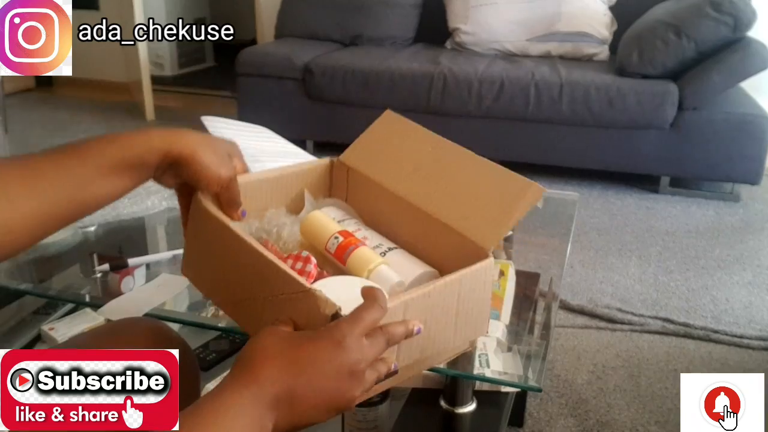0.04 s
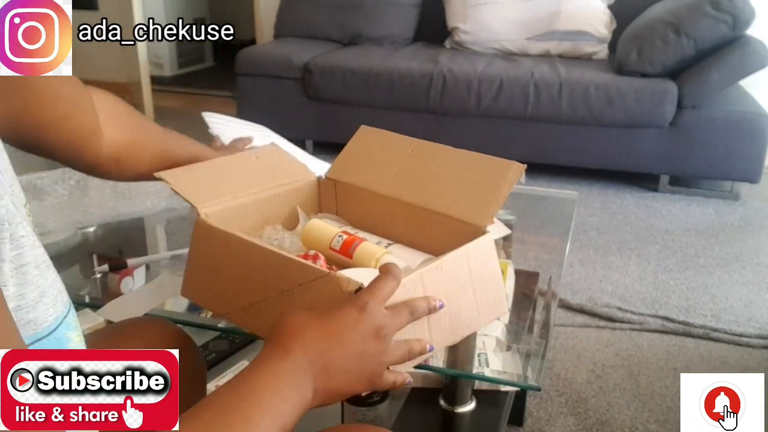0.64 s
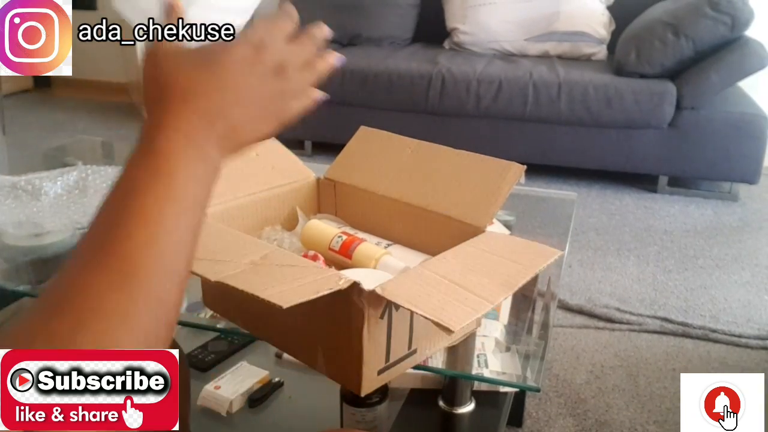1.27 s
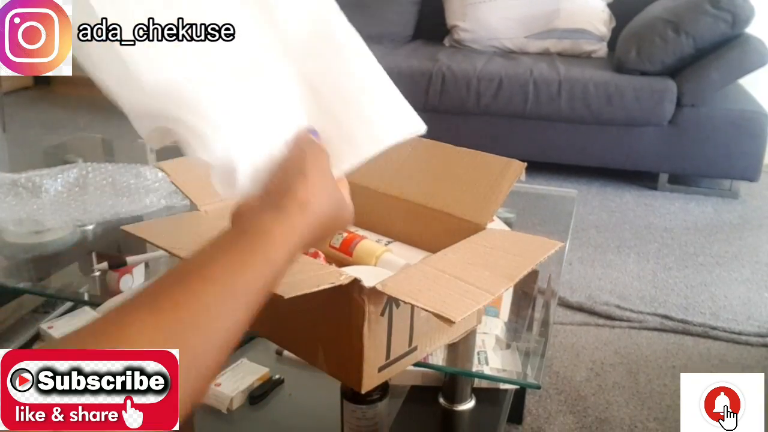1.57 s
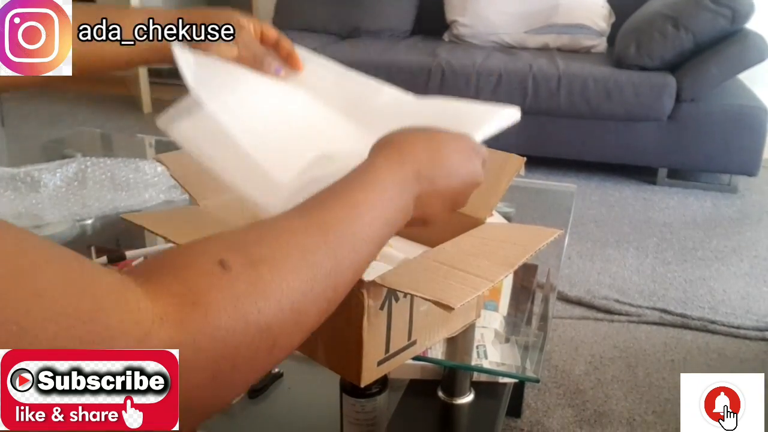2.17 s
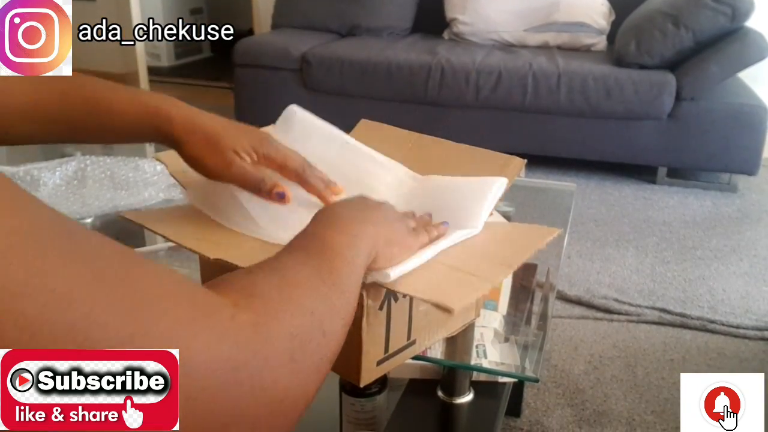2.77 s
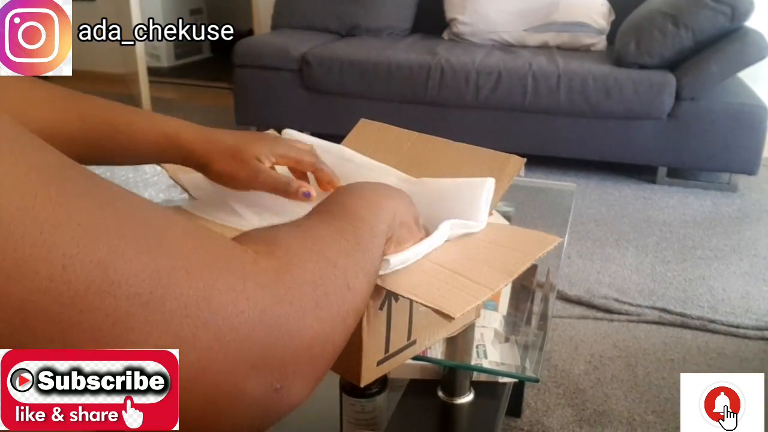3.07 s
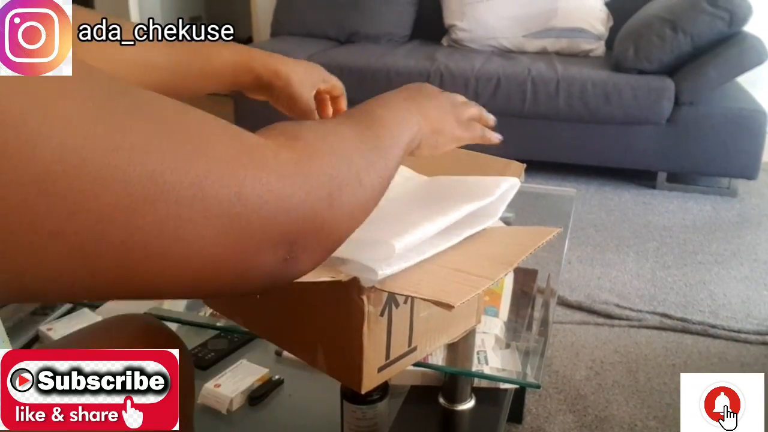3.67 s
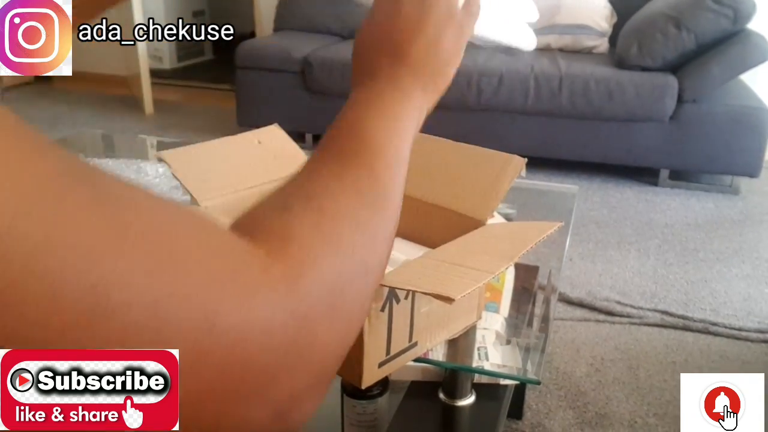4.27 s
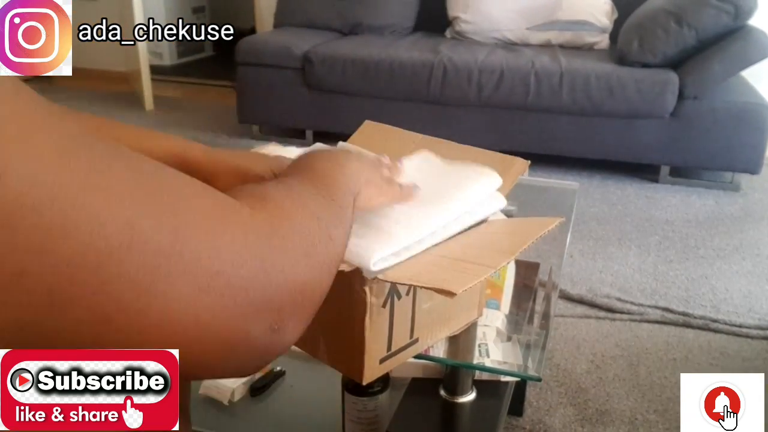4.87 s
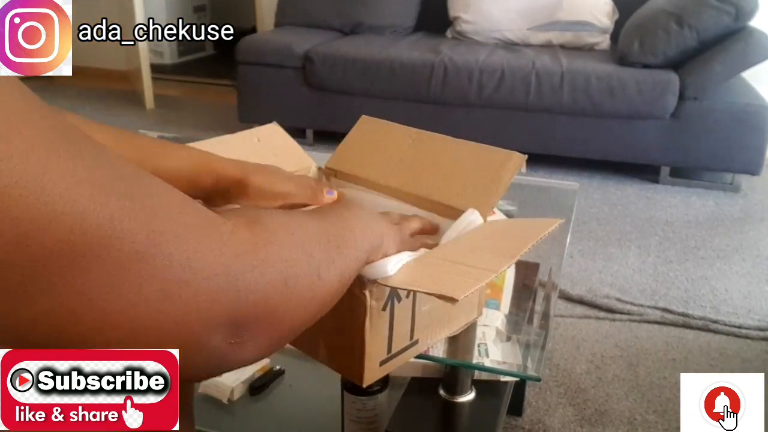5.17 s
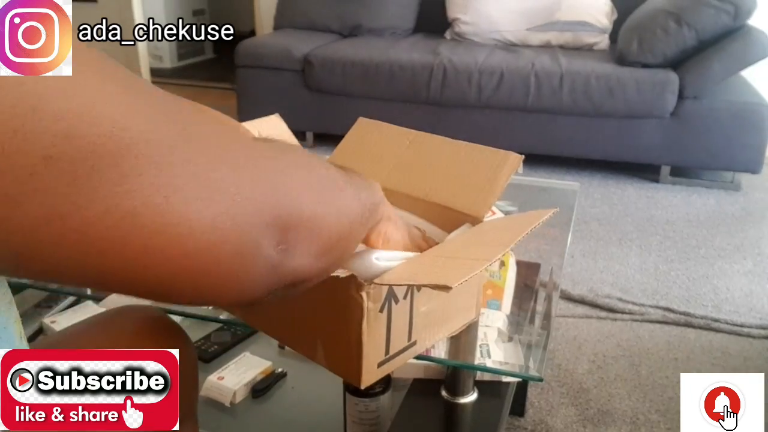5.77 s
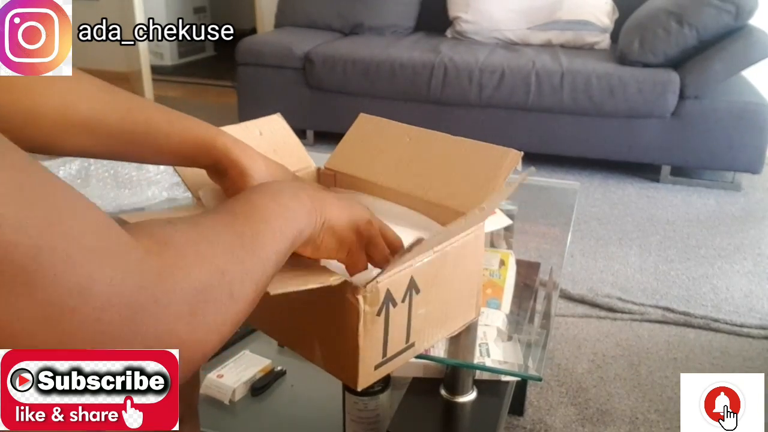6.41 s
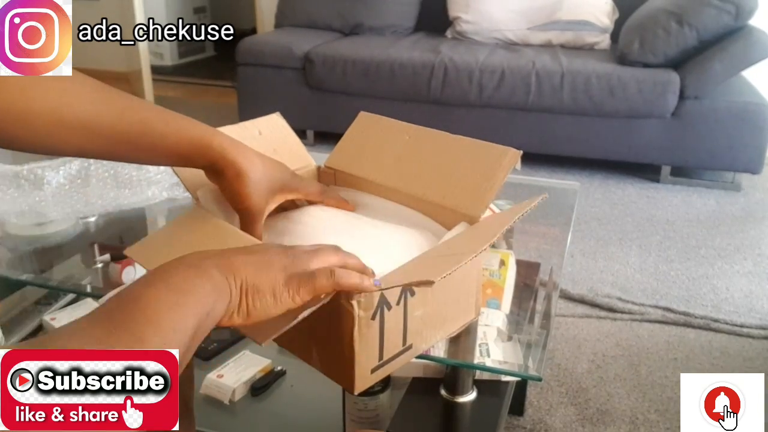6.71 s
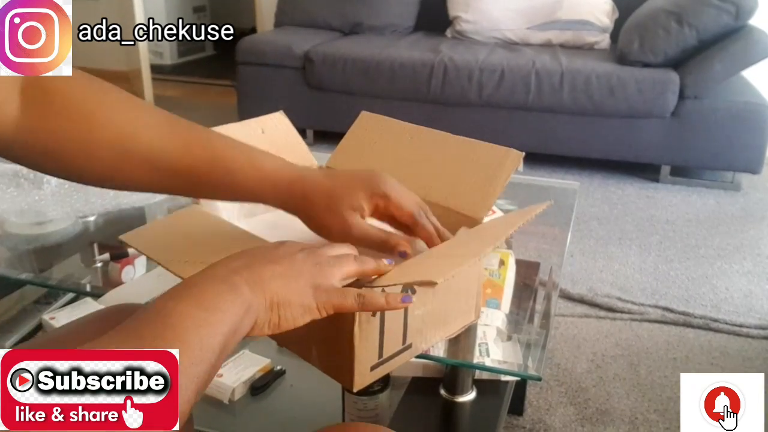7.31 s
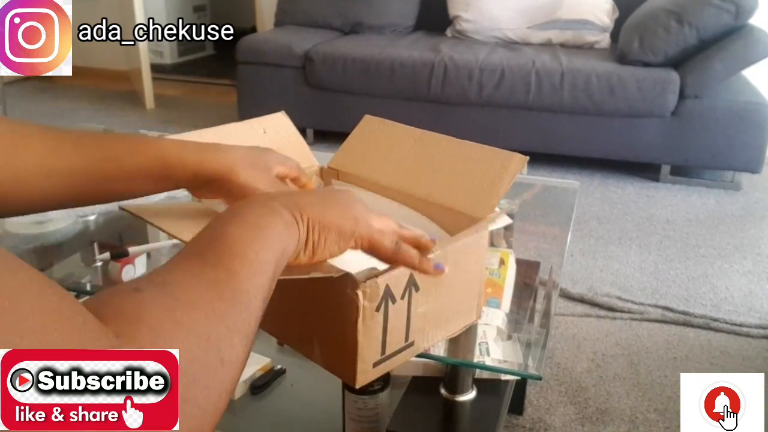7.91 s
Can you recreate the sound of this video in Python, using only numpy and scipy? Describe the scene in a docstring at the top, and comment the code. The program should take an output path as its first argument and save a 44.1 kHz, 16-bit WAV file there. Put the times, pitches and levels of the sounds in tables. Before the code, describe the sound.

A cardboard box is set down on a glass table with a quick cluster of hollow knocks and a faint scrape. Hands then slide and tuck foam wrap into it in short hissing, rasping strokes, loudest just past the middle, with occasional soft bumps and tiny crease snaps. Near the end the loose flaps clack and the box is knocked again. The sound is close, in a quiet furnished room with a faint low hum.

```python
"""Foam wrap hisses as hands lay it in a cardboard box and tuck it down, on a living-room glass table.
Stick-slip friction makes the hiss, rasps the sheet and drives the modes of the card beneath.
The box is set down and knocked: each impact rings its walls and the glass, and the whole box booms.
Loose flaps clack, dragged edges scrape and creases snap, over a low hum and the hiss of the air."""
import sys
import numpy as np
from scipy import signal
from scipy.fft import rfft, irfft
from scipy.io import wavfile
from scipy.ndimage import uniform_filter1d

SR = 44100
rng = np.random.default_rng(int(sys.argv[2]) if len(sys.argv) > 2 else 0)


def store_pcm(level_fs):
    """Save levels as 16-bit WAV."""
    pcm = np.round(np.clip(level_fs, -1, 1) * 32767).astype(np.int16)
    wavfile.write(sys.argv[1], SR, np.atleast_2d(pcm).T)


N = 355005

# hand strokes: start_s, swell_s, fade_s, hiss_db, rasp_over_hiss_db, card_over_hiss_db
HAND_STROKES = [(0.0, 0.0023, 0.85, -68, -1.5, 1.5), (0.18, 0.031, 0.22, -46.5, 3.5, 9),
                (.30, 0.077, 0.25, -49.5, -1.5, -14), (0.749, 0.16, 0.57, -58.5, -2, -12),
                (1.02, 0.12, 0.039, -59, -15.5, -27), (1.319, 0.1, 0.21, -60.5, -31, -4),
                (1.444, 0.085, 0.41, -42, -2, -5), (1.6, 0.081, 0.053, -44, -4, -15),
                (1.768, 0.16, 0.26, -53.5, -12, -21.5), (2.271, 0.015, 0.4, -53.5, -4.5, -5),
                (2.301, 0.13, 0.15, -51, 3, -2), (2.457, 0.12, 0.098, -40.5, -6, -3.5),
                (2.62, 0.19, .15, -53, -10, -22), (2.808, 0.047, 0.1, -41, -6.5, -4.5),
                (2.891, 0.043, .26, -51, -4.5, -14.5), (3.063, 0.084, 0.15, -44.5, -9, -15),
                (3.16, 0.1, 0.17, -47.5, 2.5, -3), (3.31, 0.06, 0.18, -46.5, -0.5, -5),
                (3.477, 0.016, 0.14, -43, 3.5, 3), (3.559, 0.068, 0.13, -45.5, -3, -8),
                (3.821, 0.03, 0.21, -52, -3.5, 10), (3.884, 0.039, 0.14, -39.5, -7, -29),
                (3.985, 0.038, 0.17, -48.5, 4.5, 0), (4.12, 0.058, 0.12, -48, -8.5, -36),
                (4.22, 0.088, 0.28, -50.5, -12, -38), (4.473, 0.075, 0.32, -41.5, -12.5, -22),
                (4.516, 0.054, 0.25, -51.5, 6.5, 5), (4.88, 0.07, 0.048, -42.5, -2.5, -8),
                (4.944, 0.075, 0.23, -35.5, -5, -9), (5.075, 0.075, 0.45, -36, 0, -0.5),
                (5.35, 0.12, 0.16, -53, 7.5, -6), (5.503, 0.06, 0.17, -41, -1.5, -5),
                (5.57, 0.11, 0.16, -38.5, -2.5, -9.5), (5.759, 0.15, 0.21, -44.5, 1, -4),
                (5.997, 0.094, 0.26, -40, -2, -9), (6.308, 0.062, 0.13, -42.5, 1, -6),
                (6.498, 0.091, 0.21, -45, -2.5, -7.5), (6.63, 0.062, 0.11, -46.5, -1.5, -4),
                (6.795, 0.069, 0.12, -47.5, -3.5, -4), (6.86, 0.024, 0.19, -51, 5, 8.5),
                (7.021, 0.11, 0.12, -46.5, 0.5, 0), (7.372, 0.041, 0.036, -39, -4, -1.5),
                (7.333, 0.1, 0.29, -48.5, 5, 5), (7.51, 0.067, 0.13, -54, 4, -6),
                (7.675, 0.085, 0.18, -45, -0.5, -3.5), (7.91, 0.16, .1, -43, -1.5, 1)]
# spectrum of foam on skin: frequency_hz, gain_db
HISS_SPECTRUM = [(1500, -13), (4000, 2), (5800, 0.5), (7800, -3), (9500, -1.5), (11500, 0.5), (14000, -1.5),
                 (16000, -5.5)]
# spectrum of the dragged sheet: frequency_hz, gain_db
RASP_SPECTRUM = [(600, -17), (1350, -2.5), (1900, -1), (2700, -2), (4000, -5), (5500, -13), (16000, -15.5)]
# spectrum of the rubbed box: frequency_hz, gain_db
CARD_SPECTRUM = [(60, 3), (220, -14), (380, -5.5), (620, 0.5), (1000, -1.5), (1500, -5.5), (4000, -16.5)]
# blows on the box: start_s, level_db, pitch_hz, relative_boom_db
BOX_KNOCKS = [(0.1885, -20.5, 1400, -4.5), (0.19, -16.5, 560, -3.5), (0.2562, -13.5, 1030, -7.5),
              (0.257, -16.5, 407, -17), (.409, -20.5, 840, -11), (0.441, -8, 694, -19.5),
              (1.490, -47, 183, 11.5), (1.57, -31, 563, -13), (1.657, -40.5, 281, 0),
              (2.403, -39, 286, 2.5), (2.846, -39.5, 336, -3.5), (3.828, -26, 643, -2.5),
              (4.521, -40.5, 295, 5), (4.5475, -25, 295, -6), (4.893, -45, 170, 15),
              (5.62, -22, 703, -17.5), (6.657, -45, 233, 5.5), (6.869, -32, 513, -7.5),
              (6.889, -28, 410, -16), (7.946, -24.5, 323, -11.5), (7.966, -26, 394, -15.5),
              (8.027, -22.5, 440, -10)]
# modes of the card walls: pitch_hz, level_db
WALL_MODES = [(277, 2), (360, 0.5), (535, -4), (645, -4), (785, -10.5), (880, -11), (995, -3.5),
              (1290, -4.5), (1400, -16.5), (1790, -24.5)]
# modes of the filled box on the table: pitch_hz, level_db, t60_s
BOOM_MODES = [(70.3, 2.5, 0.67), (86.6, 2, 0.24), (142.6, 2, 0.35)]
# modes of the table top: pitch_hz, level_db, t60_s
GLASS_MODES = [(2036, -31, 0.28), (2460, -27, 0.13)]
# reflections from the table top and the nearest wall: delay_s, gain_db
REFLECTIONS = [(0.0044, -19.5), (0.0088, -11)]
# clacks of loose flaps: start_s, level_db, pitch_hz
FLAP_CLACKS = [(2.433, -30.5, 1020), (3.484, -32, 3930), (3.5186, -28.5, 1660), (3.832, -37, 1380),
               (7.3506, -21.5, 1420), (7.4106, -18.5, 1130), (7.918, -37, 1160)]
# dragged edges: start_s, length_s, level_db, from_hz, to_hz
EDGE_SCRAPES = [(0.312, 0.23, -52, 2150, 2550), (0.737, 0.28, -62, 1220, 1610),
                (7.376, 0.053, -41.5, 4320, 3820)]
# snapping creases: start_s, level_db, decay_s
CREASE_SNAPS = [(0.193, -51, 0.001), (0.4406, -36.5, 0.00039), (1.45, -54.5, 0.0045), (1.734, -43, 0.0022),
                (2.433, -42, 0.0041), (4.478, -47.5, 0.0045), (6.201, -45, 0.0018), (7.3534, -38.5, 0.0011)]
# spectrum of a snap: frequency_hz, gain_db
SNAP_SPECTRUM = [(500, -14), (1500, -4.5), (4200, 14.5), (7500, 8.5), (10500, 16.5), (16000, 8)]
# spectrum of still air and microphone hiss: frequency_hz, gain_db
AIR_SPECTRUM = [(20, -19.5), (50, 13), (250, -3.5), (800, -9), (7000, -12.5), (12000, -8), (16000, -23.5)]
# reverberation time of the room: frequency_hz, t60_s
ROOM_DECAY = [(80, 0.53), (1000, 0.15), (15000, 0.052)]
# likeness of left and right: frequency_hz, coherence_ratio
STEREO_COHERENCE = [(250, 0.77), (800, 0.55), (2000, 0.23), (8000, 0)]
# level of left over right: frequency_hz, difference_db
STEREO_BALANCE = [(200, 0.5), (700, 1.5), (3600, 1), (6000, -1.6), (10000, 0.5)]


def foam_wrap():
    """Sliding friction excites the hiss of foam, the rasp of the sheet and the card under it."""
    hiss_gain, rasp_gain, card_gain = stroke_gains()
    grip = wander(rate_hz=30.0)  # the hand catches and lets go
    hiss = blotch(slips(per_s=3000, spread_db=3.5, smooth=1.3), depth_db=1.5, bins=6, frames=16)
    rasp = blotch(slips(per_s=900, spread_db=3.6, smooth=1), depth_db=2.6, bins=4, frames=20)
    card = blotch(slips(per_s=1000, spread_db=2.5, smooth=1), depth_db=2.8, bins=2, frames=22)
    hiss = unit(colour(hiss, HISS_SPECTRUM)) * amp(2.3 + grip)
    rasp = unit(colour(rasp, RASP_SPECTRUM)) * amp(1.3 + 0.14 * grip)
    card = unit(colour(wall_resonance(card), CARD_SPECTRUM)) * amp(1.5 + grip)
    return room(hiss * hiss_gain + rasp * rasp_gain + card * card_gain, wet_db=-13.5)


def stroke_gains(card_lag_s=0.0055):
    """Incoherent sources add in power: the strokes sum to the gains of hiss, rasp and card."""
    power, t = np.zeros((3, N)), np.arange(SR) / SR
    for start_s, swell_s, fade_s, hiss_db, rasp_db, card_db in HAND_STROKES:
        slide = stroke_envelope(t, swell_s, fade_s)
        press = stroke_envelope(t - card_lag_s, swell_s, fade_s)  # the hand meets the foam first
        layers = np.array([slide, amp(rasp_db) * slide, amp(card_db) * press])
        add(power, start_s, (amp(hiss_db) * layers) ** 2)
    return np.sqrt(power)


def stroke_envelope(t, swell_s, fade_s, drop_db=24):
    """Friction noise follows sliding speed: the hand gathers pace, then slows to rest."""
    speed = np.sin(np.pi / 2 * np.clip(t / swell_s, 0, 1))
    fading = np.maximum(t - swell_s, 0) / fade_s
    return speed ** 0.75 * amp(-drop_db * fading ** 1.09)


def slips(per_s, spread_db, smooth, decay_s=0.0013):
    """Stick-slip friction: tiny releases of uneven size ride on a smooth rubbing noise."""
    sizes = amp(spread_db * np.minimum(rng.exponential(1, N), 4))
    releases = sizes * (rng.random(N) < per_s / SR)
    power = signal.lfilter([1], [1, -np.exp(-1 / (decay_s * SR))], releases ** 2)
    return stereo(rng.standard_normal((2, N)) * np.sqrt(power / power.mean() + smooth ** 2))


def blotch(x, depth_db, bins, frames):
    """Random modulation: patches of the spectrum swell and fade, making the noise slightly blotchy."""
    spectra = signal.stft(x, nperseg=512, noverlap=384)[2]
    patches = uniform_filter1d(rng.standard_normal(spectra.shape[1:]), bins, axis=0)
    patches = unit(uniform_filter1d(patches, frames, axis=1))
    return signal.istft(spectra * amp(depth_db * patches), nperseg=512, noverlap=384)[1][:, :N]


def wall_resonance(x, boost_db=4, width_ratio=0.033):
    """Forced vibration: the walls amplify rubbing noise near their natural frequencies."""
    hz = np.fft.rfftfreq(N, 1 / SR)
    peaks = sum(amp(boost_db + db) / (1 + ((hz / f - 1) / width_ratio) ** 2) for f, db in WALL_MODES)
    return irfft(rfft(x) * (1 + peaks), N)


def box_knocks(dent_cycles=0.96, crack_db=-5, walls_db=-27, walls_t60_s=0.14, boom_db=-12):
    """An impact dents one spot, rocks the box and excites wall and glass modes near its own pitch."""
    knocks, booms, t = np.zeros(N), np.zeros(N), np.arange(SR // 2) / SR
    modes = [(f, walls_db + db, walls_t60_s) for f, db in WALL_MODES] + GLASS_MODES
    for start_s, level_db, pitch_hz, relative_boom_db in BOX_KNOCKS:
        cycles = pitch_hz * t
        spot = np.sin(2 * np.pi * cycles) * np.exp(-cycles / dent_cycles)
        crack = amp(crack_db) * np.sin(4 * np.pi * cycles) * np.exp(-2 * cycles)  # stiff first contact
        dent = -(spot + crack) * (1 - np.exp(-cycles / 0.13))
        excited = [(f, db - 10 * np.log10(1 + np.log2(f / pitch_hz) ** 4), t60) for f, db, t60 in modes]
        add(knocks, start_s, amp(level_db) * (dent + ring(excited, t)))
        for delay_s, gain_db in REFLECTIONS:
            add(knocks, start_s + delay_s, amp(level_db + gain_db) * dent)
        add(booms, start_s, amp(level_db + boom_db + relative_boom_db) * box_boom(t, pitch_hz))
    return room(knocks, wet_db=-7.0) + booms


def box_boom(t, pitch_hz):
    """Contact time limits bandwidth: a softer blow gives the whole box a longer, deeper push."""
    contact_s = 0.013 * (300 / pitch_hz) ** 1.64
    excited = [(f, db - 10 * np.log10(1 + (2 * f / pitch_hz) ** 4), t60) for f, db, t60 in BOOM_MODES]
    response = ring(excited, t)
    force = rng.standard_normal(len(t)) * t / contact_s * np.exp(-t / contact_s)
    boom = np.gradient(signal.fftconvolve(force, response)[:len(t)])  # only changes of motion radiate
    return boom * np.linalg.norm(response) / np.linalg.norm(boom)


def ring(modes, t):
    """Free vibration is a sum of damped sines, here slightly detuned at each blow."""
    return sum(amp(db - 60 * t / t60) * np.sin(2 * np.pi * hz * rng.normal(1, 0.011) * t)
               for hz, db, t60 in modes)


def flap_clacks(rise_s=0.0007, thud_db=-11, thud_ratio=0.505):
    """A loose flap is a heavily damped resonator: a brief clack over a duller thud."""
    out, t = np.zeros(N), np.arange(SR // 16) / SR
    envelope = t / rise_s * np.exp(1 - t / rise_s)
    for start_s, level_db, pitch_hz in FLAP_CLACKS:
        phase = 2 * np.pi * pitch_hz * t
        clack = np.sin(phase) + amp(thud_db) * np.sin(thud_ratio * phase)
        add(out, start_s, amp(level_db) * envelope * clack)
    return room(out, wet_db=-5.5)


def edge_scrapes(width_hz=420):
    """Friction drives a dragged edge, whose resonance glides as its free length changes."""
    out, pole = np.zeros((2, N)), np.exp(-np.pi * width_hz / SR)
    for start_s, length_s, level_db, from_hz, to_hz in EDGE_SCRAPES:
        progress = np.linspace(0, 1, round(length_s * SR))
        pitch_hz = from_hz * (to_hz / from_hz) ** progress
        carrier = np.exp(2j * np.pi * np.cumsum(pitch_hz) / SR)
        friction = stereo(rng.standard_normal((2, SR)))[:, :len(progress)]
        # shift down, low-pass, shift back: a band that follows the pitch
        band = (carrier * signal.lfilter([1], [1, -2 * pole, pole ** 2], friction / carrier)).real
        add(out, start_s, amp(level_db) * unit(band) * np.sin(np.pi * progress))
    return out


def crease_snaps():
    """Folds of wrap and card release stored elastic energy in short, bright bursts."""
    out, t = np.zeros((2, N)), np.arange(SR // 16) / SR
    for start_s, level_db, decay_s in CREASE_SNAPS:
        add(out, start_s, amp(level_db) * np.exp(-t / decay_s) * rng.standard_normal((2, len(t))))
    return room(colour(stereo(out), SNAP_SPECTRUM), wet_db=-7.5)


def room(x, wet_db, build_s=0.0026):
    """Reverberation adds a short diffuse tail; the furnished room absorbs the treble first."""
    hz, t, spectra = signal.stft(stereo(rng.standard_normal((2, SR // 2))), SR, nperseg=256)
    decay = amp(-60 * t / lookup(ROOM_DECAY, hz)[:, None])
    tail = signal.istft(spectra * decay, SR, nperseg=256)[1]
    tail *= np.clip(np.arange(tail.shape[1]) / SR / build_s - 0.5, 0, 1)
    tail /= np.linalg.norm(tail[0])
    return x + amp(wet_db) * signal.fftconvolve(np.atleast_2d(x), tail, axes=1)[:, :N]


def background(hum_hz=49.0, hum_db=-61.0, air_db=-66):
    """Slow modulation of pitch and level makes a low hum waver over a broadband noise floor."""
    waver_hz, waver_db = wander(rate_hz=3.8), 1.2 * wander(rate_hz=1.3)
    hum = np.sqrt(2) * np.sin(2 * np.pi * np.cumsum(hum_hz + waver_hz) / SR)
    air = unit(colour(stereo(rng.standard_normal((2, N))), AIR_SPECTRUM))
    return amp(hum_db + waver_db) * hum + amp(air_db) * air


def stereo(x):
    """Coherence falls with frequency: two independent signals become alike in the bass only."""
    size = x.shape[-1]
    mid, side = rfft(x)
    coherence = lookup(STEREO_COHERENCE, np.fft.rfftfreq(size, 1 / SR))
    mid *= np.sqrt((1 + coherence) / 2)
    side *= np.sqrt((1 - coherence) / 2)
    return irfft(np.array([mid + side, mid - side]), size)


def wander(rate_hz):
    """Low-passed noise gives a smooth random drift of unit rms."""
    hz = np.fft.rfftfreq(N, 1 / SR)
    return unit(irfft(rfft(rng.standard_normal(N)) / (1 + (hz / rate_hz) ** 4), N))


def colour(x, spectrum):
    """Linear filtering multiplies each frequency by its tabled gain."""
    size = x.shape[-1]
    return irfft(rfft(x) * amp(lookup(spectrum, np.fft.rfftfreq(size, 1 / SR))), size)


def lookup(table, hz):
    """Interpolation along a logarithmic frequency axis."""
    table_hz, values = np.transpose(table)
    return np.interp(np.log(hz + 1), np.log(table_hz + 1), values)


def add(mix, start_s, sound):
    """Superposition of a sound on the mix from start_s."""
    part = mix[..., round(start_s * SR):][..., :sound.shape[-1]]
    part += sound[..., :part.shape[-1]]


def amp(db):
    """Decibels as an amplitude ratio."""
    return 10 ** (np.asarray(db) / 20)


def unit(x):
    """Normalisation to an rms of one."""
    return x / np.sqrt(np.mean(x ** 2) + 1e-20)


def scene():
    """The pressures of all sources add by superposition."""
    return foam_wrap() + box_knocks() + flap_clacks() + edge_scrapes() + crease_snaps() + background()


def record(dry, left_lead_s=2e-5, cutoff_hz=15800):
    """Path difference: the nearer left microphone leads and is mostly louder; both are band-limited."""
    hz = np.fft.rfftfreq(N, 1 / SR)
    lean = amp(lookup(STEREO_BALANCE, hz) / 2) * np.exp(1j * np.pi * hz * left_lead_s)
    heard = irfft(rfft(dry) * np.array([lean, 1 / lean]), N)
    lowpass = signal.firwin(511, cutoff_hz, window=("kaiser", 9), fs=SR)
    return signal.oaconvolve(heard, lowpass[None], "same")


dry = scene()
out = record(dry)
store_pcm(out)
```